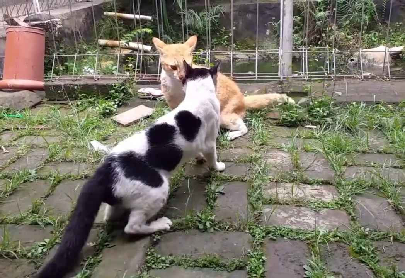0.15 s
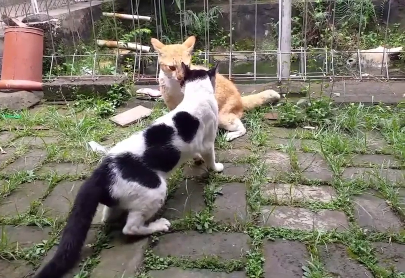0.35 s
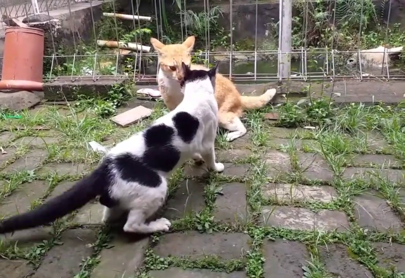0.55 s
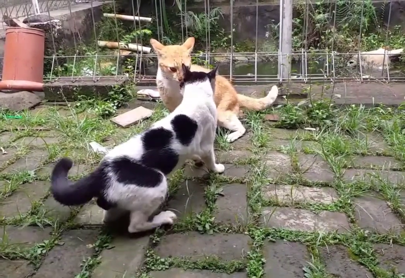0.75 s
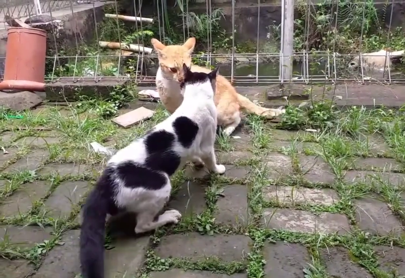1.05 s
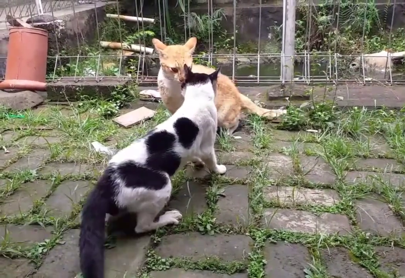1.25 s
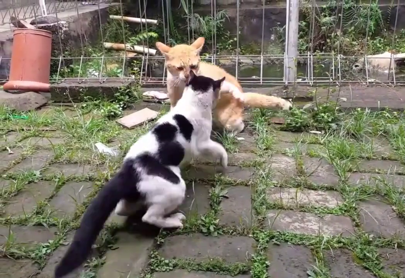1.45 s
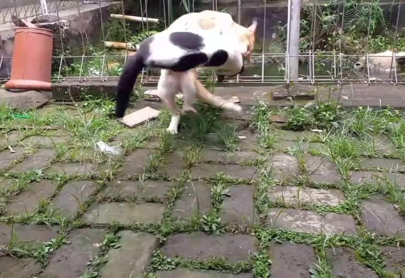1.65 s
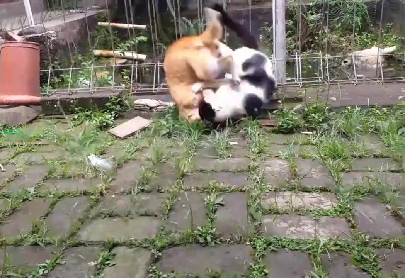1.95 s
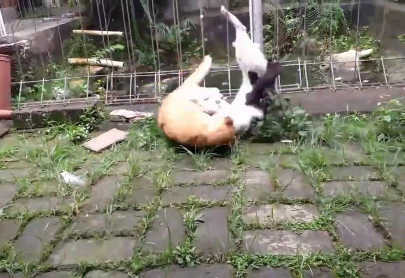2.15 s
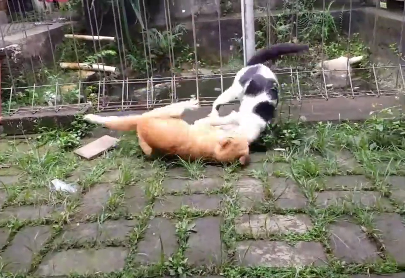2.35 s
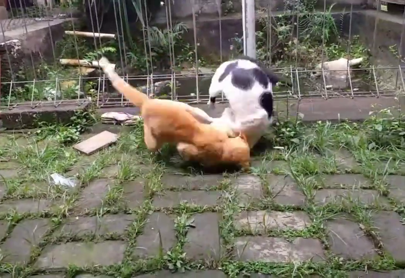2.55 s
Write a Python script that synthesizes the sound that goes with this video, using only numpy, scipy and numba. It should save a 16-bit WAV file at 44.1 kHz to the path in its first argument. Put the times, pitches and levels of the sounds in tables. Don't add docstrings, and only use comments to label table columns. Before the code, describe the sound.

Two cats fight close to the microphone in a paved yard. From 0 to 1.4 s one yowl climbs, wavers and turns raspy from about 1.1 s, over a faint low moan until 0.9 s. At 1.4 s a quick whoop bursts into a loud shrill scream, peaking near 1.6 s. Squeals, snarls, weed rustle and a dull thud follow around 1.8 s; a gritty growl sinks away by 2.6 s. Short echo, faint air and rumble.

```python
import sys
import numpy as np
from scipy import signal
from scipy.fft import rfft, irfft, next_fast_len
from scipy.io import wavfile
from scipy.ndimage import uniform_filter1d, minimum_filter1d
from numba import njit

SR = 44100
rng = np.random.default_rng(int(sys.argv[2]) if len(sys.argv) > 2 else 0)


def master_out(mix):
    frames = np.transpose(np.atleast_2d(mix))
    ceiling = np.clip(frames, -1, 1)
    pcm = np.round(ceiling * 32767).astype(np.int16)
    wavfile.write(sys.argv[1], SR, pcm)


def volts_from_decibels(level):
    exponent = np.asarray(level, float) / 20
    return 10 ** exponent


N = 119070


def unit(x):
    return x / np.sqrt(np.mean(x ** 2) + 1e-20)


def curve(rows):
    rows = np.array(rows, float)
    return [np.interp(np.arange(N) / SR, rows[:, 0], column) for column in rows[:, 1:].T]


def walk(rate):
    hold = int(SR / rate)
    steps = np.repeat(rng.standard_normal(N // hold + 1), hold)
    smooth = uniform_filter1d(uniform_filter1d(steps, hold), hold)
    return unit(smooth[:N])


@njit
def moving_bandpass(x, hz, width):
    y, b, l = np.empty(len(x)), 0., 0.
    for i in range(len(x)):
        g, k = np.tan(np.pi * hz[i] / SR), width / hz[i]
        v = (b + g * (x[i] - l)) / (1 + g * (g + k))
        b, l, y[i] = 2 * v - b, l + 2 * g * v, k * v
    return y


def band(x, hz, width):
    hz = np.clip(hz * np.ones(len(x)), 20, .44 * SR)
    once = moving_bandpass(x + 1e-18, hz, 1. * width)
    return moving_bandpass(once, hz, 1. * width)


def vocal_folds(hz, rough, double):
    jitter, shimmer_db, second_doubling = .022, 5, .3
    turns = np.cumsum(hz * (1 + jitter * rough * walk(250))) / SR
    half = np.pi * turns
    count = np.floor(16000 / hz.max())
    pulses = (np.sin((2 * count + 1) * half) / (np.sin(half) + 1e-9) - 1) / np.sqrt(2 * count)
    pulses = np.clip(pulses, -count, count)
    pairs = 1 + double * (np.cos(half) + second_doubling * np.cos(half / 2))
    pulses = pulses * pairs / np.sqrt(1 + double ** 2)
    size = volts_from_decibels(shimmer_db * rough * rng.standard_normal(N // 20)[(turns + .5).astype(int)])
    breath = rng.standard_normal(N) * (1 + .6 * np.cos(2 * half))
    return np.sqrt(1 - rough) * pulses * size + rough * breath, breath


def chest_tone(hz, level_db, rough, double):
    phase = 2 * np.pi * np.cumsum(hz) / SR
    octave_db = -10.5 * (hz / 400) ** 2 - 9.4 * double
    tone = np.sqrt(2) * (np.sin(phase) + volts_from_decibels(octave_db) * np.sin(2 * phase))
    return tone * volts_from_decibels(level_db + 1.6 * (1 + rough) * walk(25.12))


MOUTH_WIDTHS = {"yowl": 367, "moan": 74, "whoop": 185, "scream": 920, "squeal": 735, "snarl": 780, "growl":
                890}


def voice(name, rows, grit, throat, lips=None, lips_width_hz=500.):
    hz, level_db, mouth_hz, chest_db = curve(rows)
    rough, double = curve(grit)
    double = double * np.clip(1 + .35 * walk(60), 0, 2)
    hz = uniform_filter1d(hz, size=900) * (1 + .003 * walk(24.957))
    source, breath = vocal_folds(hz, rough, double)
    out = band(source, mouth_hz, MOUTH_WIDTHS[name])
    patchy_db, haze = 3, .22
    lips_hz, lips_db, top_db = curve(lips) if lips else (2500, -90, 0)
    out = out - volts_from_decibels(lips_db + patchy_db * walk(11.95)) * band(source, lips_hz, lips_width_hz)
    stretch = (hz / hz.max()) ** .2
    for k, (f, width, throat_db) in enumerate(throat):
        airy = source + haze * (f > 3500) * breath
        gain = volts_from_decibels(throat_db + top_db + patchy_db * walk(12))
        out = out - (-1) ** k * gain * band(airy, f * stretch, width)
    t = np.arange(N) / SR
    on = uniform_filter1d(1. * ((t >= rows[0][0]) & (t <= rows[-1][0])), size=600)
    chest = chest_tone(hz, chest_db, rough, double)
    return on * (unit(out) * volts_from_decibels(level_db + 1.6 * walk(22.47)) + chest)


# f/Hz, width/Hz, level/dB against the mouth
YOWL_PATH = [(.05, 205.3, -77, 1100, -80), (.1, 224.9, -43.5, 1100, -41), (.144, 243.3, -34.5, 1050, -37),
             (.194, 269.7, -30, 1195, -36.5), (.28, 297.2, -24, 1355, -37), (.348, 314.3, -22, 1320, -36),
             (.444, 326.3, -26, 1400, -33.5), (.5, 338.8, -17.5, 1490, -39),
             (.512, 344.8, -21, 1518, -34.5), (.57, 355.8, -18.5, 1580, -38.5),
             (.618, 374.2, -17, 1720, -31), (.702, 372.3, -13, 1846, -33), (.74, 382.4, -16.5, 1753, -28),
             (.81, 394, -14, 1650, -33.5), (.842, 405.4, -16, 1650, -31),
             (.908, 389.4, -16, 1686, -31), (0.966, 387.9, -18, 1694, -27), (.995, 399.2, -14, 1700, -32),
              (1.052, 391.5, -17, 1644, -31.5), (1.105, 394.1, -16.5, 1643, -27.5),
              (1.127, 374.5, -14, 1720, -31), (1.16, 374.7, -14.5, 1650, -29.5),
              (1.23, 375.6, -19, 1700, -28), (1.27, 376.6, -14.5, 1735, -28),
              (1.331, 366.5, -19, 1650, -29.5), (1.391, 371.3, -16, 1810, -25),
              (1.432, 371.3, -18, 1720, -65)]
YOWL_ROUGHNESS = [(.05, .16, 0), (.3, .09, 0), (.6, .08, 0), (.64, .05, 0), (.82, .07, .05), (.86, .1, .55),
                  (.91, .06, .05), (1.11, .04, 0), (1.125, .42, 1.6), (1.21, .33, 2), (1.25, .22, 2.4),
                  (1.3, .25, 2.2), (1.34, .5, 1.5)]
YOWL_RESONANCES = [(900, 330, -21.5), (4030, 1040, -28), (5220, 680, -19.5), (6410, 1140, -25),
                   (7630, 1170, -32), (11230, 9200, -45.5)]
# t/s, f/Hz, level/dB against the mouth, level/dB added to the upper throat
PARTING_LIPS = [(.12, 2460, -5, 4.5), (.22, 2120, -2.5, -2), (.45, 2238, -0.5, 1), (.68, 2460, -7.5, -7.5),
                (1.0, 2536, -3, -1.5), (1.1, 2500, -1, -1), (1.14, 2480, -6, -3), (1.35, 2410, -3.5, 4)]


def yowl():
    return voice("yowl", YOWL_PATH, YOWL_ROUGHNESS, YOWL_RESONANCES, PARTING_LIPS, 437)


MOAN_PATH = [
    (0, 226.9, -48, 470, -46),
    (.28, 232, -41.5, 470.8, -45),
    (.5, 249.8, -43.5, 507, -45.5),
    (.9, 235.3, -44, 475, -45.5),
    (.95, 230, -68, 458, -63),
]
MOAN_ROUGHNESS = [(0, .15, 0)]
MOAN_RESONANCES = [(927, 130, -18)]


def moan():
    return voice("moan", MOAN_PATH, MOAN_ROUGHNESS, MOAN_RESONANCES)


SCREAM_PATH = [(1.27, 231.5, -63.5, 900, -40), (1.37, 296.8, -22.5, 1117, -43.5),
               (1.41, 408.7, -15, 1800, -40), (1.445, 466.1, -16, 1620, -47), (1.5, 472.2, -14, 1650, -62),
               (1.548, 466, -20, 1580, -43), (1.56, 594, -12.5, 1700, -60), (1.6, 584.3, -12.5, 1700, -33),
               (1.635, 592.7, -5.5, 1740, -22), (1.69, 634, -15.5, 1880, -42),
               (1.725, 589, -27.5, 1756, -36), (1.78, 587, -27, 1540, -102)]
SCREAM_ROUGHNESS = [(1.4, .75, .5), (1.45, .55, .5), (1.545, .6, .6), (1.565, .22, .15), (1.62, .3, .2),
                    (1.7, .55, .3)]
SCREAM_RESONANCES = [(1100, 870, -17), (2500, 280, -9), (4170, 1160, -6.5), (6040, 1980, -9),
                     (8030, 1040, -15.5), (11800, 13000, -29.5)]
# t/s, f/Hz, level/dB against the mouth, level/dB added to the upper throat
BARED_TEETH = [(1.37, 2360, -29, -25), (1.421, 2930, -0.5, -10.5), (1.5, 3580, 4, -5.5),
               (1.57, 3130, 2, -5.5), (1.66, 3280, -2, 4), (1.72, 3159, 2.5, -4.5), (1.76, 3150, -2, -8)]


def scream():
    return voice("scream", SCREAM_PATH, SCREAM_ROUGHNESS, SCREAM_RESONANCES, BARED_TEETH, 1140)


WHOOP_PATH = [
    (1.365, 268.4, -35, 1070, -88),
    (1.39, 343.7, -11, 1370, -90),
    (1.415, 473.6, -18, 1890, -93),
    (1.44, 508, -19, 1990, -102),
]
WHOOP_ROUGHNESS = [(1.4, .3, .3)]


def whoop():
    return voice("whoop", WHOOP_PATH, WHOOP_ROUGHNESS, [])


SQUEAL_PATH = [(1.68, 529, -35.5, 1900, -38), (1.768, 546, -28, 1985, -58), (1.83, 549.7, -26, 1917, -59),
               (1.86, 559.6, -22, 1880, -46), (1.94, 584.4, -29, 1740, -47), (1.98, 573, -28, 1710, -51),
               (2.044, 556, -22.5, 1960, -54), (2.162, 569.6, -27, 2000, -57),
               (2.24, 556.3, -27.5, 1790, -51), (2.28, 545, -36, 1620, -46), (2.31, 537, -35, 1556, -61)]
SQUEAL_ROUGHNESS = [(1.8, .13, 0), (1.93, .2, .05), (2.12, .15, 0), (2.25, .3, 0)]
SQUEAL_RESONANCES = [(2880, 1930, -21.5), (4327, 780, -8), (5600, 1500, -20), (7650, 1700, -20.5),
                     (13000, 1300, -51)]


def squeal():
    return voice("squeal", SQUEAL_PATH, SQUEAL_ROUGHNESS, SQUEAL_RESONANCES)


SNARL_PATH = [(1.81, 537.6, -52, 1100, -45), (1.84, 552.4, -25.5, 1120, -36.5),
              (1.868, 556, -24.5, 1100, -44), (1.885, 488, -41, 1100, -41), (1.92, 489.2, -26, 1920, -42),
              (1.95, 517, -19.5, 2010, -41.5), (1.97, 501.4, -28.5, 1920, -46),
              (2.0, 471.5, -16, 1880, -53), (2.025, 549, -19.5, 1840, -38), (2.06, 494, -15, 2040, -44.5),
              (2.1, 501.3, -28, 2140, -46), (2.14, 465, -48, 1813, -46)]
SNARL_ROUGHNESS = [(1.8, .2, 0), (1.95, .3, .1), (1.98, .65, .7), (2.05, .45, .5), (2.1, .6, .5)]
SNARL_RESONANCES = [(900, 500, -19.5), (2920, 610, -11.5), (4510, 330, -15), (6030, 930, -11),
                    (12300, 4900, -38)]


def snarl():
    return voice("snarl", SNARL_PATH, SNARL_ROUGHNESS, SNARL_RESONANCES)


GROWL_PATH = [(2.13, 503.3, -42.5, 1100, -43), (2.198, 532, -21.5, 1100, -38.5),
              (2.24, 465, -33.5, 1078, -39.5), (2.34, 408.6, -35.5, 1000, -42),
              (2.41, 440, -30, 1100, -40.5), (2.43, 461, -24.5, 1100, -36.5),
              (2.49, 408.5, -31.5, 1030, -48), (2.55, 354, -31.5, 1140, -53), (2.61, 299, -41.5, 1220, -73)]
GROWL_ROUGHNESS = [(2.2, .55, .5)]
GROWL_RESONANCES = [(1650, 1120, -5), (2142, 230, -3.5), (4770, 3000, -26.5)]


def growl():
    return voice("growl", GROWL_PATH, GROWL_ROUGHNESS, GROWL_RESONANCES)


# t/s, level/dB, decay/s
SCUFFLE_BURSTS = [
    (1.45, -37, .08),
    (1.819, -26, 0.039),
    (1.97, -40, 0.37),
    (2.3, -54, 1),
]
# f/Hz, width/Hz, level/dB
RUSTLE_BANDS = [(5000, 6000, 5.5), (11550, 5900, 2.5)]


def scuffle():
    t, env = np.arange(N) / SR, np.zeros(N)
    for start, db, decay in SCUFFLE_BURSTS:
        age = np.maximum(t - start, 0) / decay
        env = env + volts_from_decibels(db) * np.exp(-age) * (1 - np.exp(-20 * age))
    grains = rng.standard_normal(N) * volts_from_decibels(2.2 * rng.exponential(size=N) + 2 * walk(15))
    return env * unit(sum(volts_from_decibels(db) * band(grains, f, width) for f, width, db in RUSTLE_BANDS))


# t/s, f/Hz, level/dB
BODY_THUDS = [
    (1.83, 220, -41.5),
]


def thuds():
    t, out = np.arange(N) / SR, 0
    for start, hz, db in BODY_THUDS:
        age = np.maximum(t - start, 0) / .02
        out = out + volts_from_decibels(db) * age * np.exp(1 - age) * unit(band(rng.standard_normal(N), hz, 260.0))
    return out


def scatter(x):
    delays_ms, strength = np.array((.9, 1.7, 2.9, 4.3)), .5
    size = next_fast_len(N + SR // 4)
    lead = int(sum(delays_ms) * SR / 1000)
    late = np.exp(-2j * np.pi * np.arange(size // 2 + 1) / size * delays_ms[:, None] * SR / 1000)
    allpass = np.prod((late - strength) / (1 - strength * late), axis=0)
    return irfft(rfft(x, size) * allpass, size)[lead:N + lead]


def echo(near):
    age = np.arange(SR // 2) / SR
    fade = volts_from_decibels(-60 * age / .22)
    tail = rng.standard_normal(len(age)) * fade * (age > .006)
    thin = signal.sosfilt(signal.butter(2, 600, "high", fs=SR, output="sos"), near)
    return volts_from_decibels(-4) * signal.fftconvolve(thin, tail / np.sqrt(np.sum(tail ** 2)))[:N]


# f/Hz, level/dB
AIR_COLOUR = [(60, -23), (450, -12.5), (700, -19.5), (1200, -20), (7000, -30), (9000, -52), (15500, -29.5)]


def yard():
    t, air, points = np.arange(N) / SR, 0, np.array(AIR_COLOUR)
    for hz in 40 * 2 ** np.arange(0, 8.7, .5):
        db = np.interp(np.log(hz), np.log(points[:, 0]), points[:, 1]) + 1.5 * walk(7)
        air = air + volts_from_decibels(db) * band(rng.standard_normal(N), hz, hz / 2)
    rumble = unit(band(rng.standard_normal(N), 82, 81.0)) * volts_from_decibels(-56.5 + 0.64 * walk(5))
    rumble = rumble * volts_from_decibels(-8 * (t > 1.42))
    duck_db = -3 / (1 + np.exp((1.577 - t) / 0.021))
    return (unit(air) * volts_from_decibels(-45.5) + rumble) * volts_from_decibels(duck_db)


def scene():
    cats = yowl() + moan() + scream() + whoop() + squeal() + snarl() + growl()
    near = scatter(cats) + scuffle() + thuds()
    return (near + echo(near) + yard())[None]


def low_pass(x):
    return signal.sosfilt(signal.butter(12, 16850, fs=SR, output="sos"), x)


def record(dry):
    ceiling = .75
    dry = signal.sosfilt(signal.butter(2, 50, "high", fs=SR, output="sos"), dry)
    room = np.minimum(1, ceiling / (np.abs(dry) + 1e-9))
    gain = uniform_filter1d(minimum_filter1d(room, size=441), size=441)
    mix = dry * gain / ceiling * .92
    return low_pass(mix)


dry = scene()
out = record(dry)
master_out(out)
```